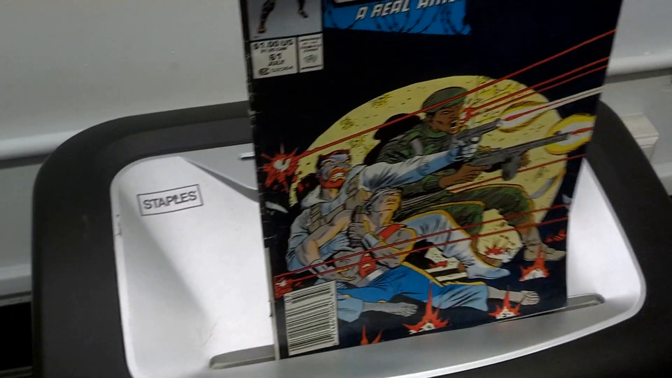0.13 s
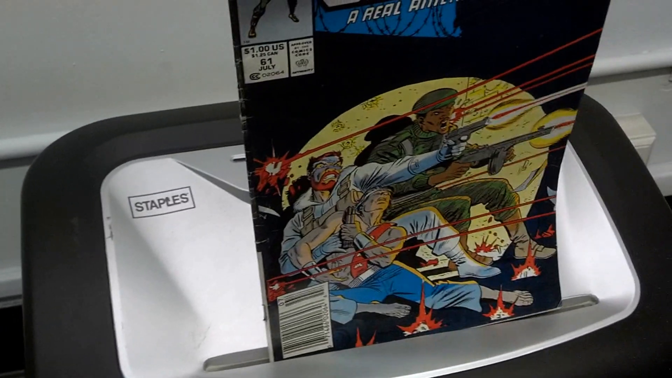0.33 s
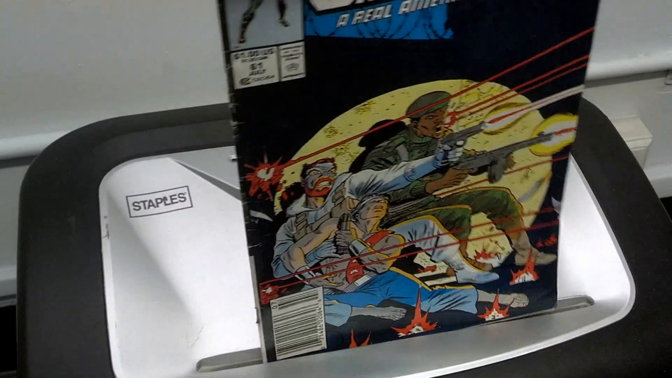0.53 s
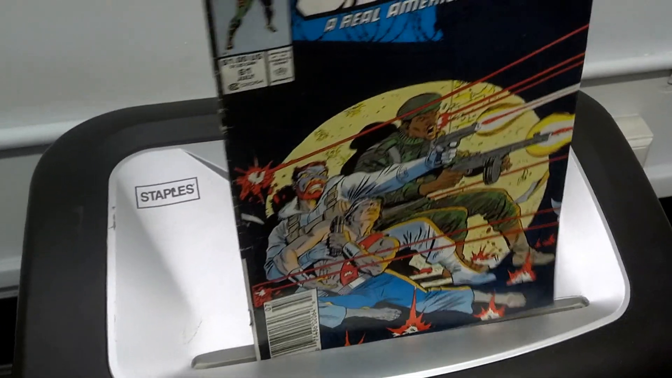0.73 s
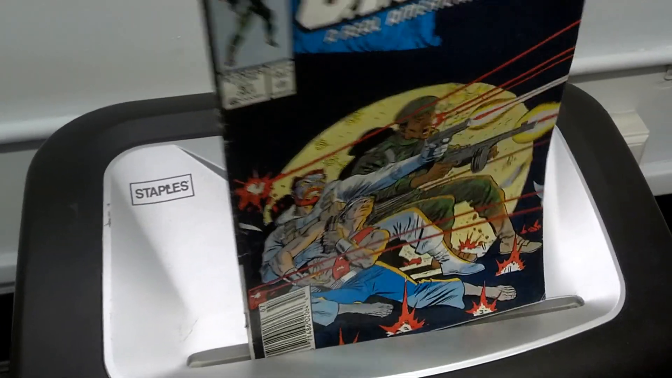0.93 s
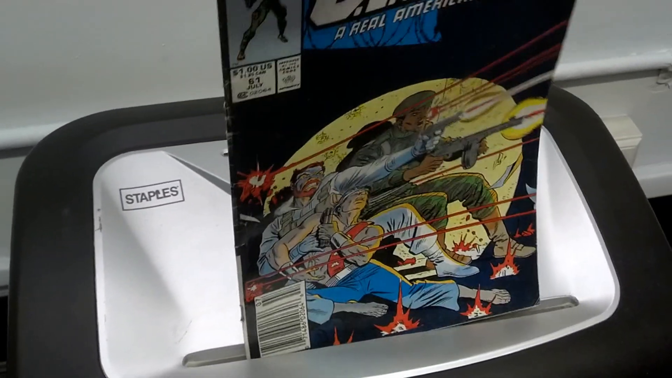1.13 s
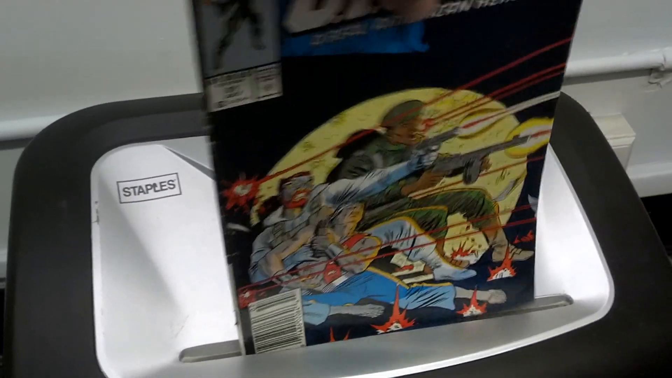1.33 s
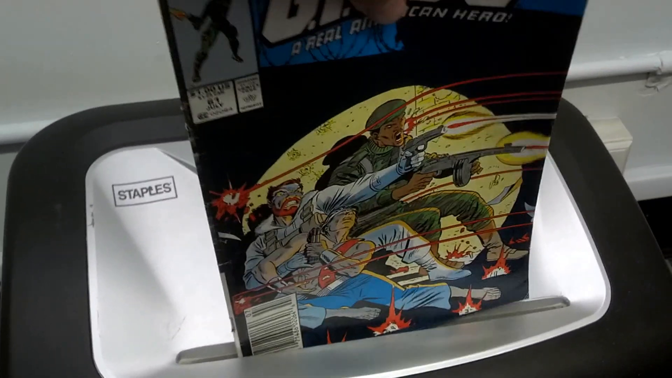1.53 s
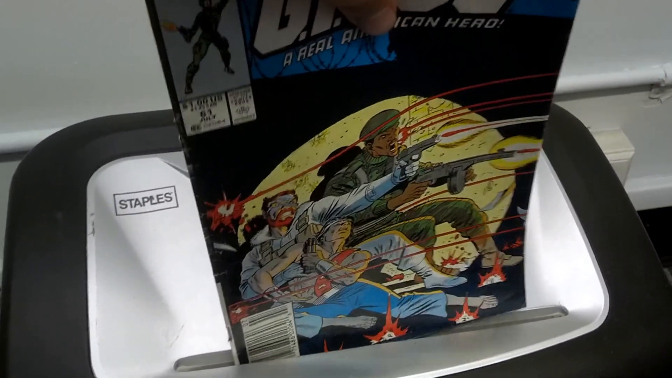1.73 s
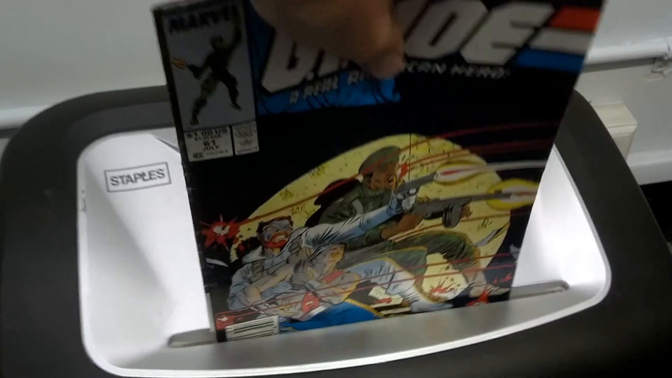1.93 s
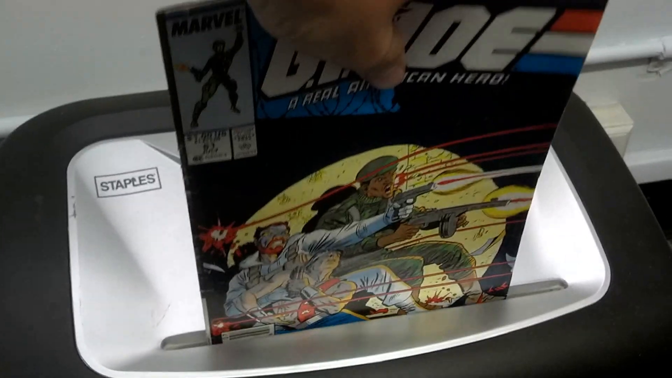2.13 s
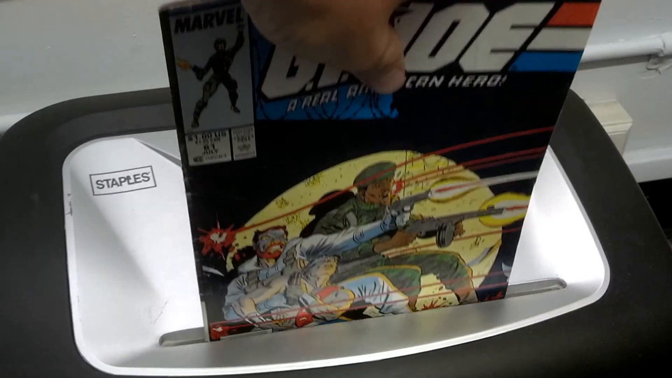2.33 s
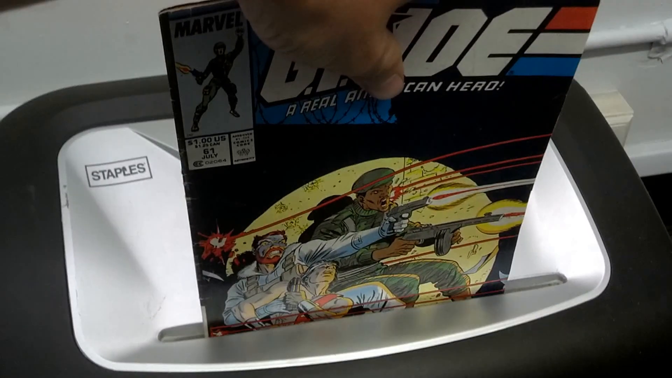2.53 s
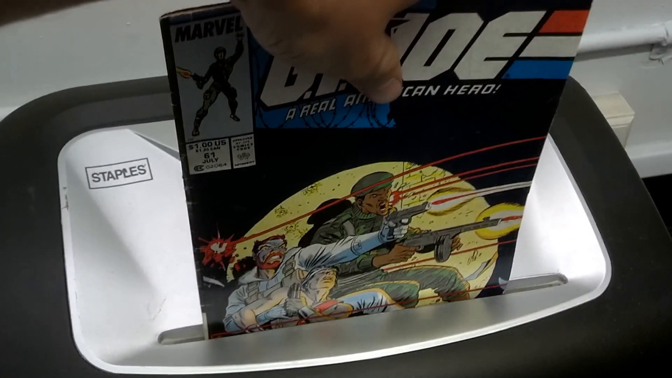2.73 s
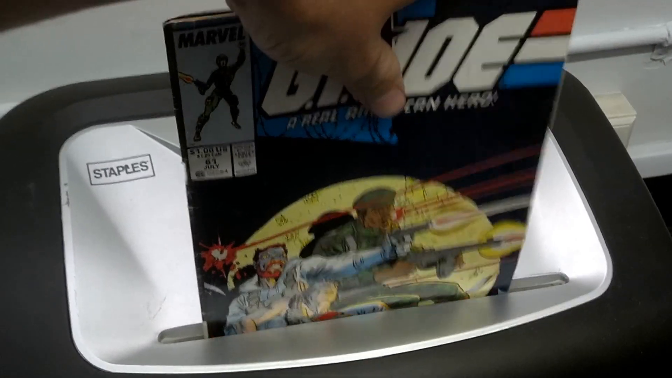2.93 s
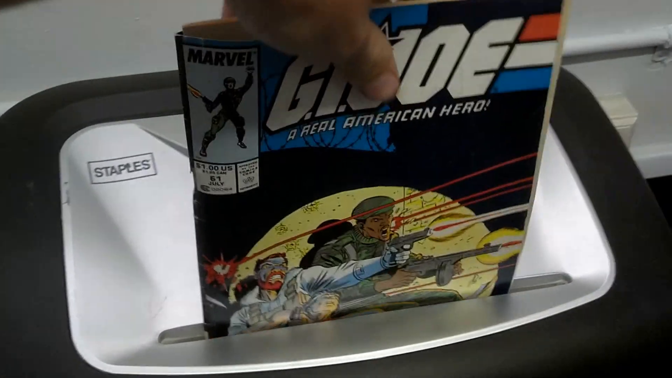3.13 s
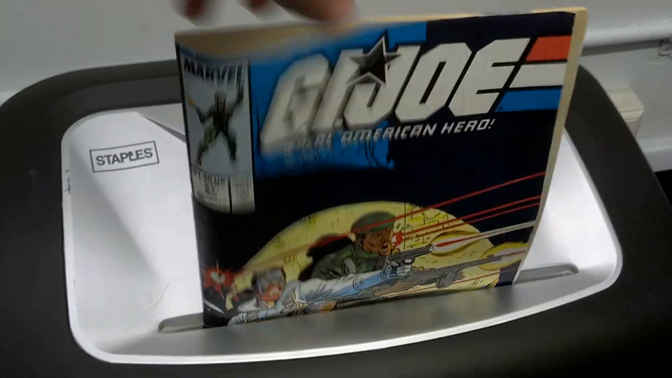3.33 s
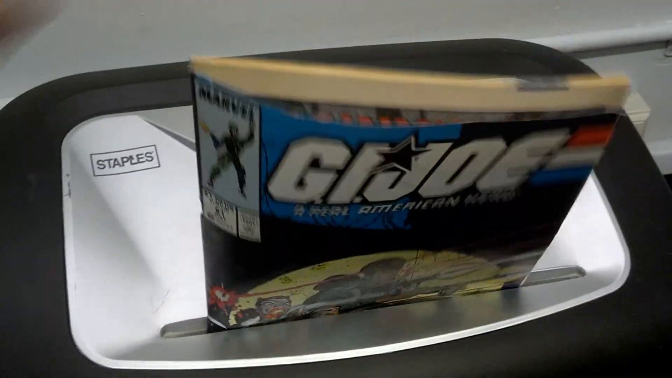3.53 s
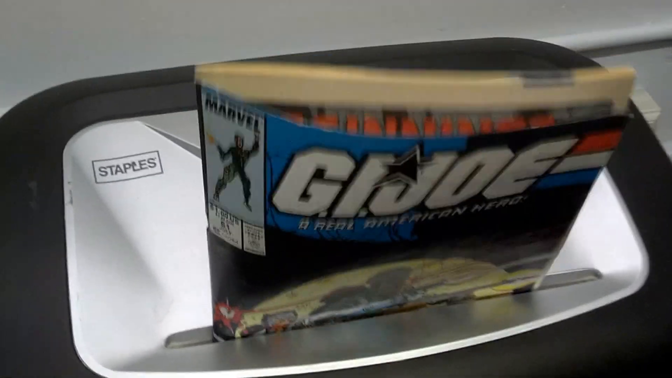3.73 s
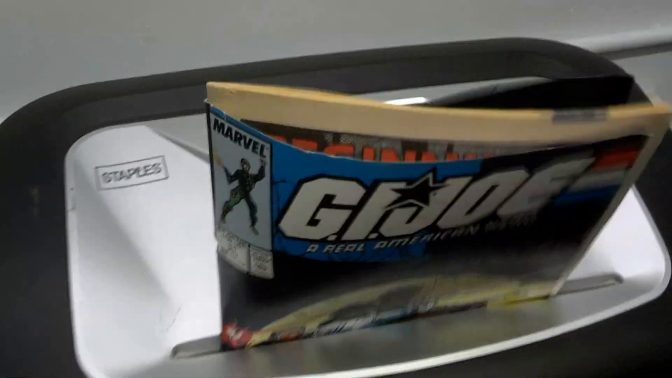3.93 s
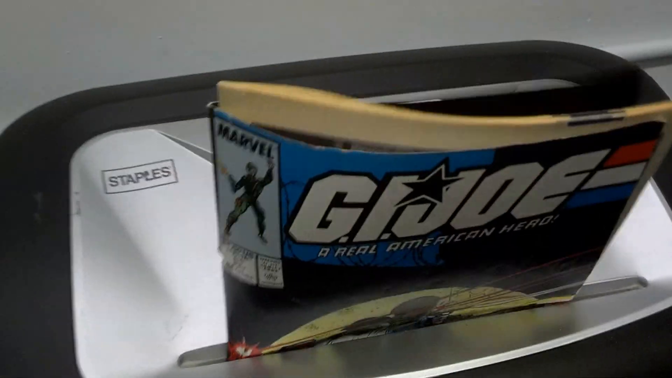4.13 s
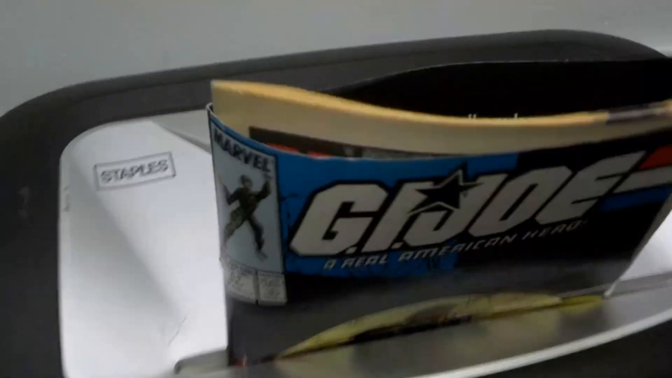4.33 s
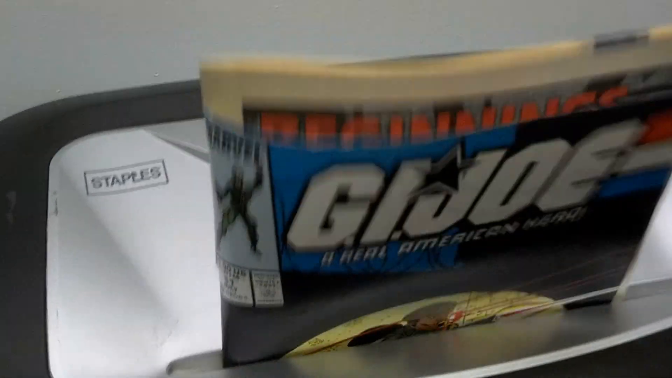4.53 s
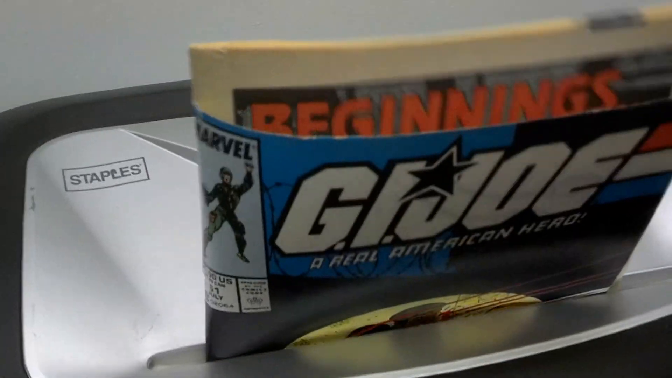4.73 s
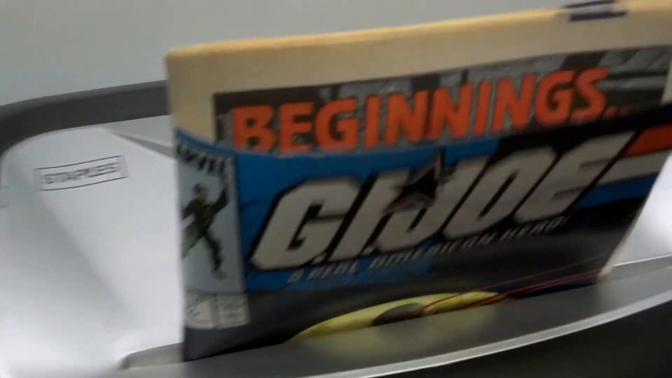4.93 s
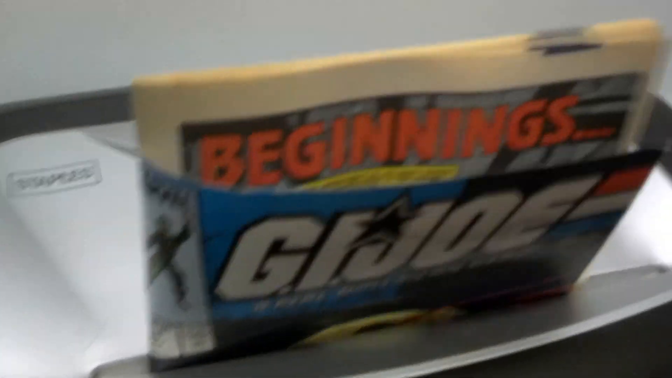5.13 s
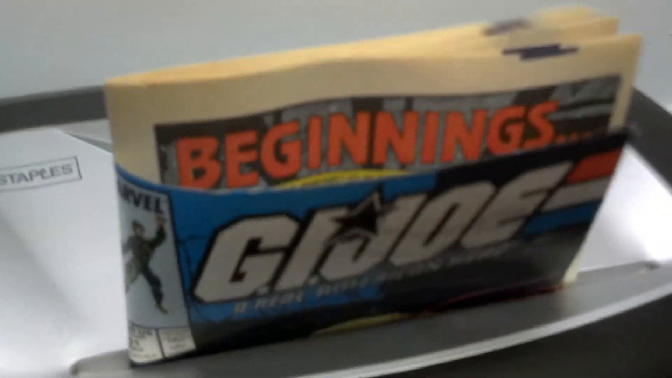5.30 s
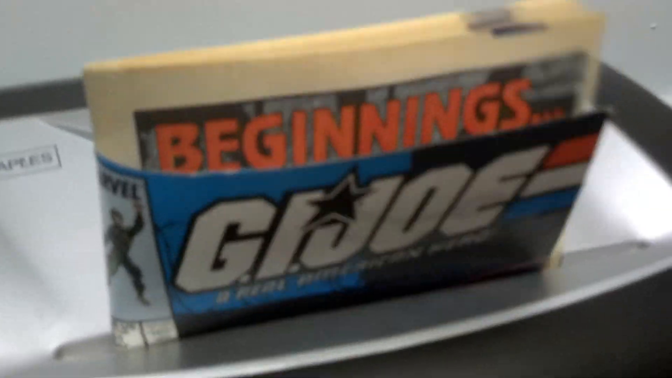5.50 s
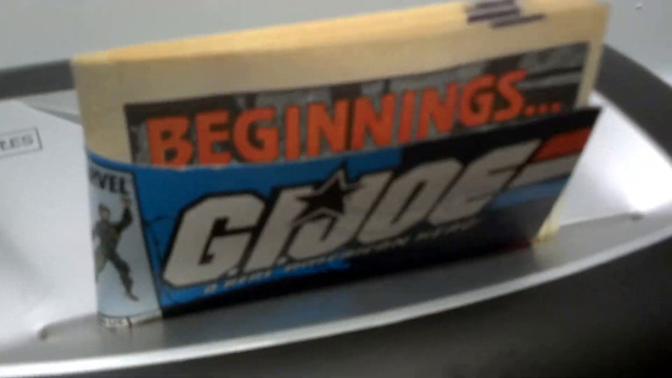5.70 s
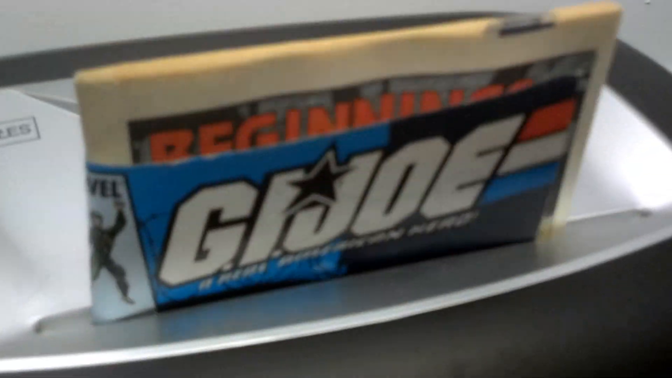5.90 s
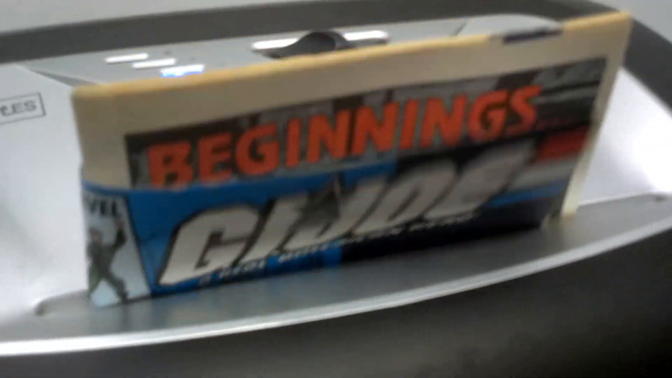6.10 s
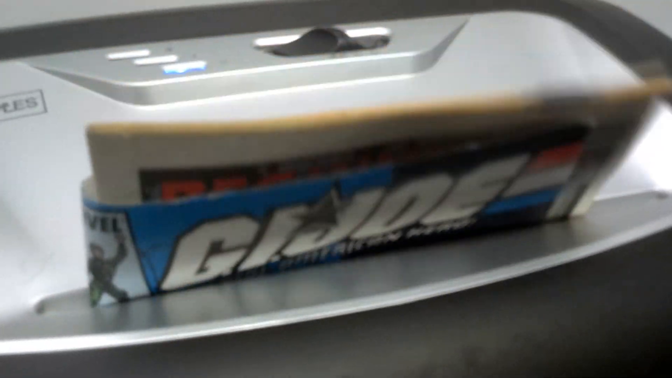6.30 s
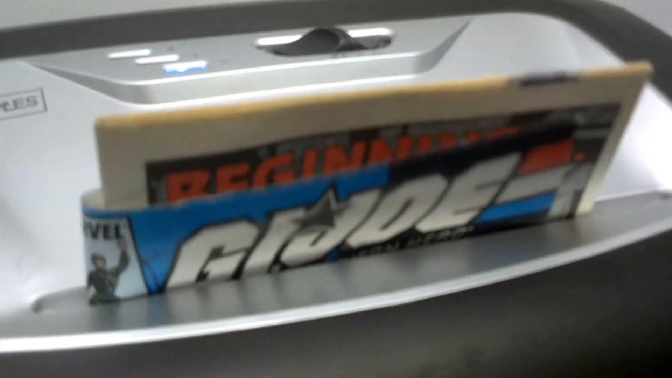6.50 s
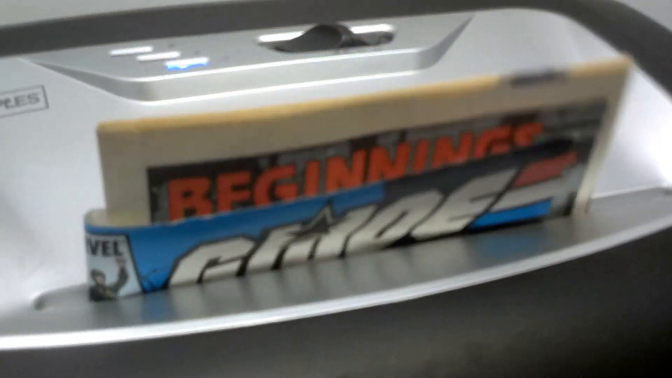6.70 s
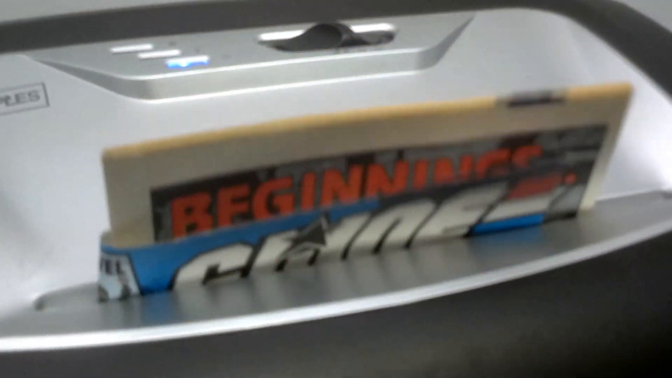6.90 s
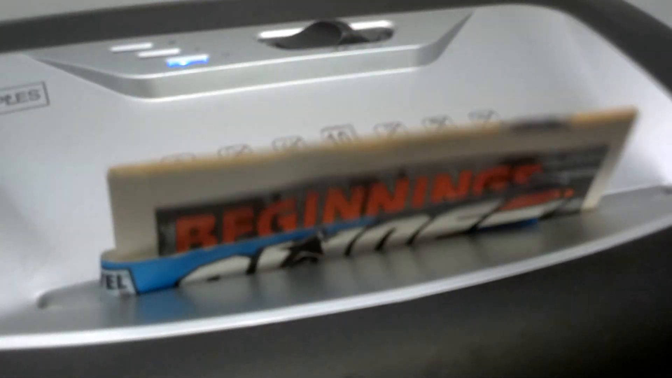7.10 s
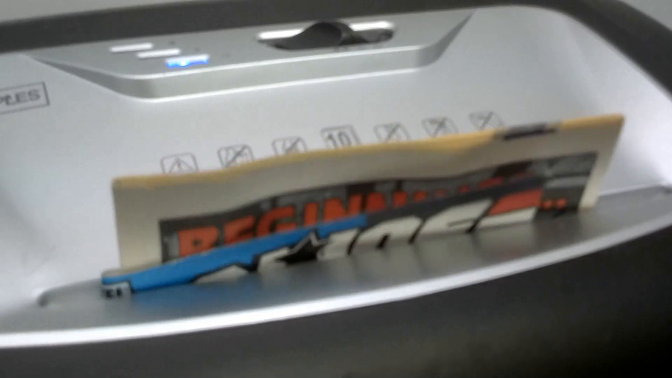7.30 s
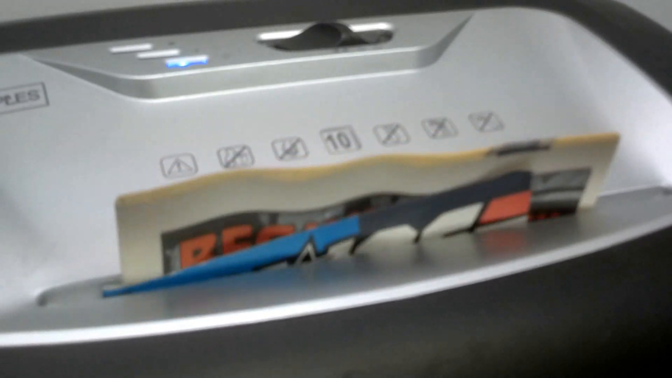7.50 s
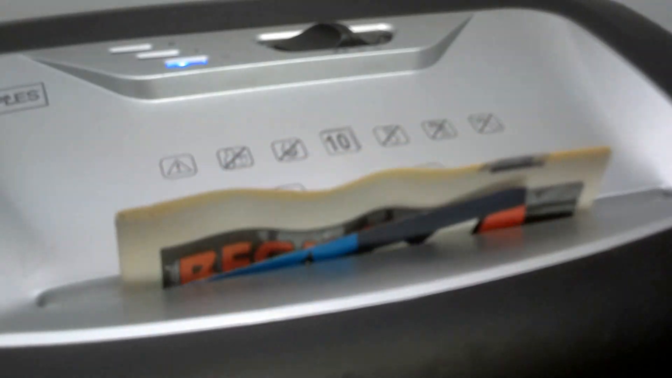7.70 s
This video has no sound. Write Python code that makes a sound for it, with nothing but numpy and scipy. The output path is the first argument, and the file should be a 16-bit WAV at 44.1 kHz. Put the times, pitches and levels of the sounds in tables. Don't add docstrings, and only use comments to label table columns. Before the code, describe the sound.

Quiet ventilation wash with a faint low fan drone. A booklet scrapes and clicks into a plastic slot, ending in a hard click. A shredder motor thumps on and runs up freely, then teeth bite: pitch drops to a labouring, wavering gear whine with rattling housing, rustle, tearing and irregular dry snaps until the end. Close, wide stereo pocket camera, its level ducking after loud peaks.

```python
import sys
import numpy as np
from scipy import signal
from scipy.fft import rfft, irfft, next_fast_len
from scipy.io import wavfile
from scipy.ndimage import uniform_filter1d

SR = 44100
rng = np.random.default_rng(int(sys.argv[2]) if len(sys.argv) > 2 else 0)


def transcribe(signal):
    frames = np.atleast_2d(signal).T
    limited = np.clip(frames, -1, 1)
    pcm = np.round(limited * 32767).astype(np.int16)
    wavfile.write(sys.argv[1], SR, pcm)


def volts_from_db(level):
    exponent = np.asarray(level, float) / 20
    return 10 ** exponent


N = 341775
TIME = np.arange(N) / SR
START_S, BITE_S = 2.273, 2.9

# [t/s, f/Hz]
SHAFT_SPEED = [(2.33, 130), (2.4, 133), (2.61, 154.6), (2.94, 158), (3.07, 134.4), (3.2, 122),
               (3.45, 117.5), (4.85, 119), (5.05, 112), (5.85, 112), (6.3, 117), (7.0, 116.5), (7.75, 117)]
# [t/s, speed swing/Hz, housing rattle level/dB, tearing level/dB, gear force level/dB]
CUTTER_WORK = [(2.27, 0, -50.5, -68, 0), (2.3, 0, -38.5, -49, 3), (2.39, 0, -25, -38.5, -2),
               (2.83, 2.5, -24.5, -37.5, -21), (2.92, 0, -20, -33.5, 3.5), (3.09, 3.5, -28.5, -34.5, 3.5),
               (3.4, 3.5, -29.5, -33.5, -2), (3.95, 1, -30, -34, 2.5), (4.15, 1, -32.5, -33, -5),
               (4.52, 2.5, -30.5, -32, -2.5), (4.8, 4, -31.5, -38, -3), (5.2, 7.5, -34, -39.5, -2.5),
               (5.6, 4.5, -31.5, -34.5, 3.5), (6.0, 7, -32.5, -37, 3.5), (6.4, 2.5, -32, -34, 0.5),
               (6.72, 5, -31.5, -36, -0.5), (7.0, 2.5, -31.5, -36, -2), (7.75, 6, -30, -36, 6)]
# [t/s, speed offset f/Hz, extra swing f/Hz, mesh level/dB, overtone level/dB]
STROKES = [(2.95, 0.0, 0.5, -1, 2), (3.104, -0.5, 4.0, 0, 3), (3.245, -0.5, -0.5, -1.5, -2),
           (3.392, -0.5, -0.5, 1, 4), (3.542, 0.5, 3, 3, -1.5), (3.691, -1.0, -0.5, -6, 3.5),
           (3.841, 1.5, 0.5, -2.5, -2), (3.99, 3, 3, 0.5, -2), (4.139, 0.0, 0, -1.5, -0.5),
           (4.288, -1.5, -2, 1.5, 6.5), (4.436, 1.0, 0.5, 0.5, -0.5), (4.585, -0.5, -5, -5, 1.5),
           (4.733, 1.5, 0, 0.5, 0.5), (4.881, 0.5, -1, 4, 3.5), (5.034, -2.0, -3, 0, 3),
           (5.191, 2.0, -2, 2, 1.5), (5.348, -1.5, 1.0, -2.5, 0), (5.505, -1.5, -4, -0.5, 1),
           (5.663, 1.0, 0.0, -2, -4.5), (5.82, -1, 0, 0.5, 0.4), (5.976, -2.5, -1, -3, -4),
           (6.13, -2.0, -1.5, 0, -2.5), (6.282, -2.5, 0.5, -1, 1), (6.433, 1, -1, -2, 0.5),
           (6.583, 0.5, -2.5, -4, 1), (6.734, 3, -1.5, -3, 1.5), (6.885, -4.5, -1.5, 5.5, -2.5),
           (7.036, 1.5, -1.5, -4, 5), (7.187, 0.5, 2, 1.4, 0.5), (7.337, 0, -1.5, -8, -5.5),
           (7.486, 3, -1.5, -3, -2), (7.635, 3, -2.5, -1.5, -5.5)]
# [f/Hz, level/dB]
RADIATION = [(420, -30.5), (450, -34), (470, -33.5), (495, -33.5), (540, -33.5), (630, -27.5), (840, -59),
             (910, -36), (950, -29), (985, -25), (1020, -35), (1260, -34.5)]
# [shaft multiple, level re mesh overtone/dB]
MESH_HARMONICS = [(12, -17.5), (16, -14.5)]
# [shaft multiple, level re unbalance/dB]
SHAFT_ORDERS = [(2, -5), (2.5, -8), (6, -7)]
# [t/s, f/Hz, level/dB]
BRUSHES = [(2.35, 7960, -78), (2.6, 9340, -56), (2.69, 9415, -50), (2.78, 9435, -46), (2.88, 9440, -48),
           (2.93, 9250, -56), (3.0, 8800, -75)]
# [f/Hz, level/dB]
MAINS_HUM = [(120, -46), (240, -48.5)]
# [f/Hz, level/dB per Hz]
RATTLE_SPECTRUM = [(200, -42), (450, -5), (700, -2.5), (800, -5), (1100, 5), (1500, -7.5), (2000, 0),
                   (2600, -9), (4500, -18), (9000, -26.5), (11000, -38)]
# [f/Hz, width/Hz, lift level/dB]
PANELS = [(295, 27, 29), (697, 18.4, 9.5), (770, 5, 1), (1120, 6.4, -0.5), (1377, 17, 10), (1506, 17, 12.5),
          (1634, 15, 8.5), (1920, 20, 1.5), (3090, 65, 6.5)]
# [f/Hz, level/dB per Hz]
RUMBLE_SPECTRUM = [(40, -75), (80, -12), (150, -3.5), (350, 0.5), (600, 1), (1200, -50)]
# [f/Hz, level/dB per Hz]
COOLING_FAN_SPECTRUM = [(400, -21), (650, 11.5), (800, 7.5), (950, 8.5), (1300, -41), (3000, -11),
                        (4500, -43)]
# [f/Hz, level/dB per Hz]
RUSTLE_SPECTRUM = [(500, -30), (1500, -0.5), (3000, 4.5), (4500, -1.5), (5300, -4), (6100, -2.5),
                   (7000, 4.5), (9000, -4), (12000, -12.5), (16000, -16.5)]
# [t/s, rise/s, top level/dB, fade/(dB/s)]
SLIDES = [(1.09, .04, -57, 64), (1.195, .01, -59.5, 60), (1.34, 0.024, -58.5, 60), (1.497, .004, -51, 85),
          (1.545, 0.0046, -47, 172), (1.797, 0.04, -40, 28), (1.87, 0.02, -37.5, 152),
          (1.96, 0.036, -63, 48), (2.029, 0.0039, -29, 165)]
# [f/Hz, level/dB per Hz]
CRACK_SPECTRUM = [(1500, -46), (2800, 4), (4000, 2), (5800, -5), (7200, 6.5), (9500, -3.5), (13000, -13),
                  (16000, -16.5)]
# [t/s, peak level/dB, low part level re peak/dB]
FOLD_SNAPS = [ (3.008, -18, -2), (3.0246, -34, 1), (3.2048, -16, -16), (3.4391, -23.5, 1),
              (3.543, -23.5, -23), (3.674, -19.5, -19), (3.688, -17.5, 0), (3.8008, -22.5, 0),
              (3.9607, -26.5, 11.5), (4.1163, -21, -5), (4.1414, -20.5, 4), (4.253, -22.5, -10),
              (4.272, -22.5, 5), (4.358, -24, -9), (4.3927, -21.5, -5), (4.5392, -16, -29),
              (4.913, -16.5, -22), (5.2297, -27.5, -8), (5.6622, -26.5, -13.5), (6.7874, -28, -1),
              (5.741, -22, -13), (6.002, -26, -24), (6.375, -21.5, -8), (6.8139, -21.5, -4),
              (6.835, -21.5, -11), (7.193, -29, -2), (7.41, -28, 1), (7.4303, -23, -15), (7.653, -21.5, -8),
              (7.731, -26, 0.5)]
# [t/s, peak level/dB, body part level re peak/dB]
SHEET_SNAPS = [(3.1083, -23, -17), (3.5813, -17, -9), (3.8833, -19, -17), (3.931, -15.5, -5),
               (3.977, -17, -9), (4.4733, -16.5, -16), (4.508, -19, -16), (4.7012, -20.5, -34),
               (4.9342, -25.5, -25), (5.014, -23, -14), (5.144, -22, -15), (5.3675, -25.5, -20),
               (5.4495, -23, -24.5), (5.5318, -20, -22), (5.64, -21.5, -16), (5.7057, -23, -26),
               (5.771, -18.5, -19), (5.796, -16, -33.5), (5.8292, -14, -15), (5.8568, -17, -30),
               (5.9165, -22.5, -24.5), (5.9477, -17, -17), (6.0583, -24, -31), (6.1064, -22, -20.5),
               (6.1749, -24, -24), (6.324, -18.5, -29), (6.7046, -23, -18), (6.924, -21, -30),
               (7.0, -19.5, -9), (7.331, -18, -15)]
# [t/s, peak level/dB, body part level re peak/dB]
FIBRE_TICKS = [(1.891, -39, -22), (2.485, -23, 3), (2.6594, -18, 0), (2.8823, -19.5, -17),
               (2.93, -17.5, -11), (2.9584, -26, -6), (2.9688, -23, 0), (3.0679, -27, -18),
               (3.1607, -27, -11), (3.4905, -17, -18), (3.6296, -32, -6.5), (3.9175, -26, -8),
               (4.1264, -18, 1), (4.153, -14.5, -9), (4.2618, -17, 1), (4.284, -15.5, -7.5),
               (4.646, -18, -23.5), (4.829, -19.5, -16), (4.966, -24.5, -14.5), (5.0215, -17, -11),
               (5.0607, -26, -10), (5.182, -20.5, -24.5), (5.2674, -42.5, -19), (5.2915, -26.5, -23),
               (5.311, -21, -20), (5.402, -22, -12), (5.4301, -24, -22), (5.513, -27, -14.5),
               (5.6945, -26, -20), (5.815, -16, -12), (5.836, -12, -29), (5.8744, -28, -18),
               (6.1604, -24.5, -14), (6.2372, -31.5, -17), (6.2836, -23, -13), (6.418, -14.5, -13),
               (6.443, -25, -17), (6.4637, -26.5, -10), (6.539, -22, -24), (6.638, -25.5, -12),
               (6.684, -26, -11), (6.714, -22, -18), (6.8243, -16, -7), (6.9486, -31, -17.5),
               (7.1048, -39, -9), (7.126, -23.5, -8.5), (7.1676, -36, -16), (7.2426, -18, -16),
               (7.517, -19.5, -22.5), (7.6201, -24, -10.5), (2.71, -19, 1), (2.809, -19.5, -14),
               (3.169, -23, -8), (4.1097, -20, -12), (4.201, -25, -7.5), (5.7275, -28, -23),
               (5.7545, -27, -16), (6.8949, -25, -18), (7.416, -23, -18), (7.6651, -21, -24.5)]
# [t/s, peak level/dB, low part level re peak/dB, ring f/Hz]
SLOT_CLICKS = [(1.0107, -58, 12, 673), (1.498, -36.5, -21, 1196), (1.544, -30, -4, 640),
               (1.695, -48, -9, 670), (1.797, -25, -17, 1330), (1.807, -30, -5, 1190),
               (1.8142, -20.5, -11.5, 810), (1.9030, -20.5, -44, 7400), (1.9673, -57, 17, 1220),
               (2.0068, -25, -32, 3600), (2.0334, -12.5, -6, 1400)]
# [t/s, peak level/dB, f/Hz, t60/s]
KNOCKS = [
    (1.814, -30, 366, 0.1),
    (1.85, -33.5, 377, 0.11),
    (2.033, -38, 1420, 0.06),
    (2.045, -28, 664, 0.14),
    (2.294, -20, 253.6, 0.43),
    (2.278, -31, 126, 0.53),
    (4.051, -15, 196, 0.053),
    (6.639, -24.5, 182, 0.11),
]
# [f/Hz, level/dB per Hz]
AIR_SPECTRUM = [(50, -67), (75, -5), (100, -0.5), (300, -0.5), (900, -2.5), (1500, -7), (2500, -14.5),
                (5000, -27.5), (7000, -25.5), (10000, -27.5), (15000, -23.5)]
# [middle t/s, half length/s, level/dB]
DRONE_SWELLS = [
    (.24, 0.25, -52),
    (.62, 0.18, -47.5),
    (1.34, 0.16, -53),
]
# [f/Hz, likeness 0-1, left level re right/dB, share fed across 0-1]
CAPSULES = [(103, 0.99, -1.5, 0.69), (630, 0.89, -4, 0.97), (990, 0.43, -2.5, 0.96), (1400, 0, -8, 0.68),
            (2470, 0, -1, 0.66), (3330, 0.15, -1, 0.3), (4620, 0, -6, 0.72), (5700, 0.22, -1.5, 0),
            (6930, 0, 2, 0.14), (8320, 1, 11.5, 0.48), (9700, 0, -2.5, 0.21), (16200, 0, 1, 0)]
# [t/s, drop level/dB]
GAIN_TRIPS = [
    (1.798, 3.5),
    (1.902, 4.5),
    (2.032, 6),
    (3.207, 9.5),
    (4.478, 5.5),
    (5.532, 10),
    (6.84, 3),
    (6.926, 6.5),
]


def evened(x):
    return x / np.sqrt(np.mean(x ** 2) + 1e-20)


def curves(rows):
    s, *columns = np.transpose(rows)
    return [np.interp(TIME, s, c) for c in columns]


def coloured(x, spectrum):
    hz, db = np.transpose(spectrum)
    size = next_fast_len(x.shape[-1])
    bins_hz = np.fft.rfftfreq(size, 1 / SR)
    shape = volts_from_db(np.interp(np.log(bins_hz + 1), np.log(hz), db))
    return irfft(rfft(x, size) * shape, size)[..., :x.shape[-1]]


def drift(hz):
    rate = SR / 32
    lowpass = signal.butter(N=3, Wn=hz, fs=rate, output="sos")
    slow = signal.sosfilt(lowpass, rng.standard_normal(round((N / SR + 2) * rate)))
    return evened(np.interp(TIME + 1, np.arange(len(slow)) / rate, slow))


def noise(spectrum, flutter_db, flutter_hz):
    flutter = volts_from_db(flutter_db * drift(flutter_hz))
    return evened(coloured(rng.standard_normal((2, N)), spectrum) * flutter)


def tone(turns, db, rough_db):
    phase = 2 * np.pi * (turns + rng.random())
    waver = volts_from_db(db + rough_db * np.array([drift(43), drift(33)]))
    return np.sqrt(2) * waver * np.array([np.cos(phase), np.sin(phase)])


def add(mix, s, sound):
    part = mix[round(s * SR):][:len(sound)]
    part += sound[:len(part)]


def shaft():
    turns_per_cut, cut_frees_s = 17.606, 4.733
    mean_hz, = curves(SHAFT_SPEED)
    strokes = np.cumsum(mean_hz) / SR / turns_per_cut
    since_free = strokes - strokes[round(cut_frees_s * SR)]
    offset_hz, extra_hz, *_ = curves(STROKES)
    swing_hz = np.maximum(curves(CUTTER_WORK)[0] + extra_hz, 0) * (TIME > BITE_S)
    return mean_hz + offset_hz + swing_hz * np.cos(2 * np.pi * since_free)


def gears(speed, turns, free_db):
    hz, db = np.transpose(RADIATION)
    force_db = free_db + curves(CUTTER_WORK)[3]
    *_, mesh_stroke_db, over_stroke_db = curves(STROKES)
    mesh_db = np.interp(4 * speed, hz, db) + force_db + 1.06 * drift(6.2) + mesh_stroke_db
    over_db = np.interp(8 * speed, hz, db) + force_db + 1.06 * drift(6.2) + over_stroke_db
    mesh = [(4, mesh_db), (8, over_db)]
    mesh += [(k, over_db + relative_db) for k, relative_db in MESH_HARMONICS]
    return sum(tone(k * turns, level_db, rough_db=3.5) for k, level_db in mesh)


def rotor(speed, turns, free_db, play):
    since_s = np.maximum(TIME - START_S, 0)
    rotor_db = -51 + 0.4565 * (speed - 116)
    jolt_db = 22 * np.exp(-since_s / 0.11)
    out = tone(0.97 * turns, rotor_db + jolt_db + 2.7 * play, rough_db=3)
    for k, db in SHAFT_ORDERS:
        out += tone(k * turns, rotor_db + db + 0.12 * free_db + 3.6 * drift(6.2), rough_db=4)
    return out


def electrics():
    brush_hz, brush_db = curves(BRUSHES)
    whine = tone(np.cumsum(brush_hz) / SR, brush_db, rough_db=6) * (TIME < BRUSHES[-1][0])
    return whine + sum(tone(hz * TIME, db, rough_db=-1.5) for hz, db in MAINS_HUM)


def ringing(x):
    size = next_fast_len(N)
    hz = np.fft.rfftfreq(size, 1 / SR)
    lift_db = sum(db / (1 + (2 * (hz - f) / width) ** 2) for f, width, db in PANELS)
    return irfft(rfft(x, size) * volts_from_db(lift_db), size)[:, :N]


def housing(speed, wheel):
    rattle_db = curves(CUTTER_WORK)[1]
    rumble_db = -7 + 18 * np.exp(-np.maximum(TIME - START_S, 0) / 0.1)
    fan_db = -3.5 + 0.5 * np.minimum(speed - 150, 0)
    throb = 1 + 0.043 * (wheel - 1)
    out = volts_from_db(rattle_db + 1.5) * throb * ringing(noise(RATTLE_SPECTRUM, 0.79, 38))
    out += volts_from_db(rattle_db + rumble_db + 1.5) * noise(RUMBLE_SPECTRUM, 2.3, 34)
    out += volts_from_db(rattle_db + fan_db) * noise(COOLING_FAN_SPECTRUM, 0.99, 38)
    return out * (TIME > START_S)


def motor():
    speed = shaft()
    turns = np.cumsum(speed * (1 + 0.016 * drift(45))) / SR
    free_db = -18 * np.clip((BITE_S - TIME) / 0.025, 0, 1)
    play = drift(4.56)
    beat = np.cos(2 * np.pi * turns / 5) + 2 * np.cos(4 * np.pi * turns / 5 + 2 * play)
    wheel = 1 + 0.15 * beat
    tones = wheel * gears(speed, turns, free_db) + rotor(speed, turns, free_db, play) + electrics()
    return tones * np.clip((TIME - 2.3) / 0.047, 0, 1) + housing(speed, wheel)


def tearing_power():
    flurry_s, flurry_db = 0.0082, -9.5
    lead_in_s, lead_in_db = 0.0033, -11
    chew = 1 + 0.24 * np.cos(4 * np.pi * np.cumsum(shaft()) / SR / 5)
    power = volts_from_db(2 * curves(CUTTER_WORK)[2]) * (TIME > START_S) * chew ** 2
    for s, rise_s, db, fade_db_s in SLIDES:
        fade_db = fade_db_s * np.maximum(TIME - s - rise_s, 0)
        power += np.clip((TIME - s) / rise_s, 0, 1) * volts_from_db(2 * (db - fade_db))
    for s, db, *_ in FOLD_SNAPS + SHEET_SNAPS:
        add(power, s, volts_from_db(2 * (db + flurry_db)) * np.exp(-TIME[:SR // 4] / flurry_s))
        add(power, s - 1 / 50, volts_from_db(2 * (db + lead_in_db)) * np.exp(-TIME[SR // 50::-1] / lead_in_s))
    return power


def paper():
    size = volts_from_db(2.6 * np.minimum(rng.exponential(1, N), 2.8)) * (rng.random(N) < 330 / SR)
    grain = np.arange(500) * np.exp(-np.arange(500) / 30)
    shape = signal.oaconvolve(size, grain)[:N]
    tears = evened(coloured(shape * rng.standard_normal((2, N)), RUSTLE_SPECTRUM))
    return np.sqrt(tearing_power()) * (0.76 * noise(RUSTLE_SPECTRUM, 2.1, 29) + 0.64 * tears)


def snap(db, low_db, hz, body_db, tail_db):
    crack_s, rise_s, break_s = 0.0014, 0.0009, 0.0007
    t = np.arange(6000) / SR
    shake = rng.standard_normal((2, len(t)))
    rise = 1 - np.exp(-t / rise_s)
    burst = shake * rise * (np.exp(-((t - rise_s) / crack_s) ** 2) + volts_from_db(tail_db - 60 * t / 0.41))
    burst[:, round(break_s * SR)] += 4 * rng.standard_normal()
    colour = []
    for f, level_db in CRACK_SPECTRUM:
        page = np.exp(-(np.log2(f / 3560) / 0.42) ** 2 / 2)
        colour.append((f, level_db + (body_db + 14) * page))
    bright = coloured(burst, colour) * np.cos(np.pi / 2 * t / t[-1]) ** 2
    band = signal.butter(N=3, Wn=[750, 2300], btype="band", fs=SR, output="sos")
    low = signal.sosfilt(band, burst)
    ring = 0.21 * volts_from_db(-60 * t / 0.021) * np.sin(2 * np.pi * hz * t) * rise
    return volts_from_db(db) * (bright / abs(bright).max() + volts_from_db(low_db) * low / abs(low).max() + ring)


def snaps():
    out = np.zeros((N, 2))
    rows = [(s, db, low_db, 3575, -11) for s, db, low_db in FOLD_SNAPS]
    rows += [(s, db, -12.5, 6660, body_db) for s, db, body_db in SHEET_SNAPS]
    rows += [(s, db - 5.5, -12.5, 6660, body_db) for s, db, body_db in FIBRE_TICKS]
    for s, db, low_db, hz, body_db in rows:
        ring_hz = hz * (1 + 0.034 * rng.standard_normal())
        add(out, s, volts_from_db(10.5) * snap(db, low_db, ring_hz, body_db, tail_db=-17.5).T)
    return out.T


def clicks():
    out = np.zeros((N, 2))
    for s, db, low_db, hz in SLOT_CLICKS:
        add(out, s, volts_from_db(11.5) * snap(db, low_db, hz, body_db=-12.5, tail_db=-18.5).T)
    return out.T


def knocks():
    out, t = np.zeros((N, 2)), np.arange(SR // 2) / SR
    for s, db, hz, t60_s in KNOCKS:
        envelope = volts_from_db(db - 60 * t / t60_s) * (1 - np.exp(-t / 0.0033))
        add(out, s, (envelope * np.sin(2 * np.pi * hz * t))[:, None])
    return out.T


def air():
    swell = np.zeros(N)
    for s, half_s, db in DRONE_SWELLS:
        swell += volts_from_db(db) * np.clip(1 - ((TIME - s) / half_s) ** 2, 0, 1)
    drone = np.sqrt(2) * swell * np.sin(2 * np.pi * 142 * TIME)
    return volts_from_db(-46.5) * noise(AIR_SPECTRUM, 0.16, 12.5) + drone


def scene():
    return motor() + paper() + snaps() + clicks() + knocks() + air()


def widened(dry):
    cross_delay_s, left_lead_s, edge_hz = 18 / 44100, 0.00008, 15800
    size = next_fast_len(N)
    hz = np.fft.rfftfreq(size, 1 / SR)
    at_hz, *columns = np.transpose(CAPSULES)
    same, left_db, share = (np.interp(np.log(hz + 1), np.log(at_hz), c) for c in columns)
    same = np.clip(same, 0, 1)
    across = share * np.exp(-2j * np.pi * hz * cross_delay_s)
    lead = np.exp(2j * np.pi * hz * left_lead_s)
    scattered, right = rfft(dry, size)
    a = volts_from_db(left_db)
    left = a * (same * lead * right + np.sqrt(1 - same ** 2) * scattered)
    kept = np.sqrt((1 + a ** 2) * (1 + share ** 2) / 2 - 2 * a * same * across.real * lead.real)
    sides = np.array([left - across * right, right - across * left])
    return irfft(sides / kept * (hz < edge_hz), size)[:, :N]


def gain_control():
    recovery_db_s = 7
    gain_db, last_db, last_s = np.zeros(N), 0, 0
    for s, drop_db in GAIN_TRIPS:
        last_db = min(0, last_db + recovery_db_s * (s - last_s)) - drop_db
        last_s = s
        recovering_db = np.minimum(0, last_db + recovery_db_s * (TIME - s))
        gain_db = np.where(TIME > s + 0.002, recovering_db, gain_db)
    return volts_from_db(uniform_filter1d(gain_db, 60))


def top_cut(x):
    return signal.sosfilt(signal.butter(12, 16510, fs=SR, output="sos"), x)


def record(dry):
    mix = widened(dry) * gain_control()
    return top_cut(mix)


dry = scene()
out = record(dry)
transcribe(out)
```